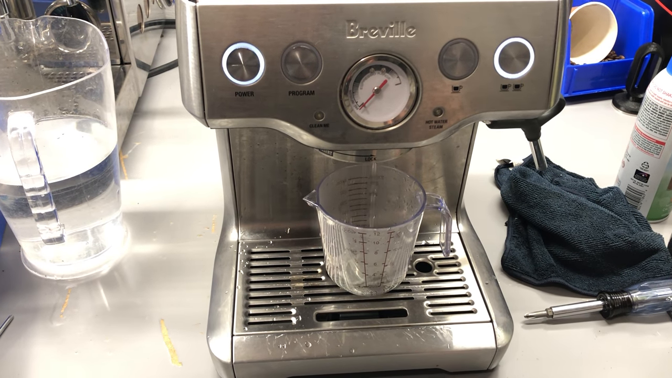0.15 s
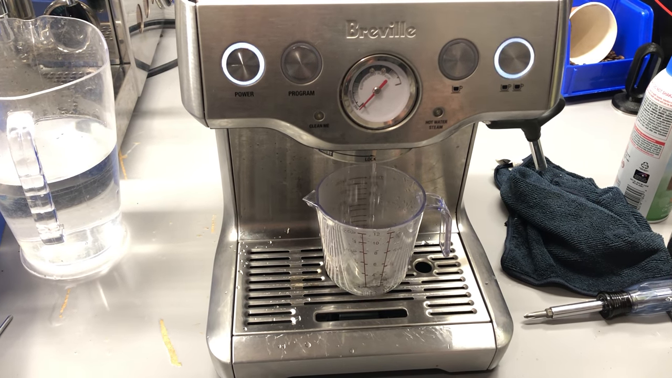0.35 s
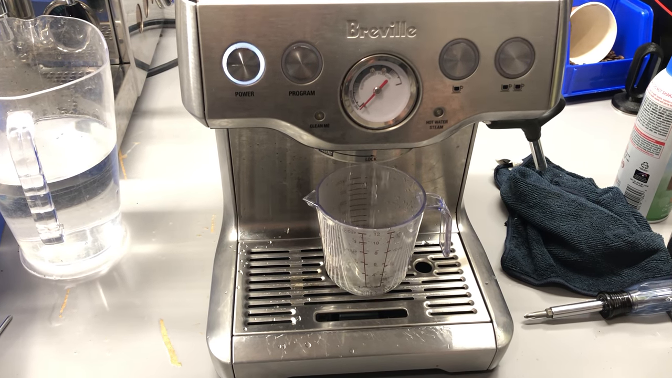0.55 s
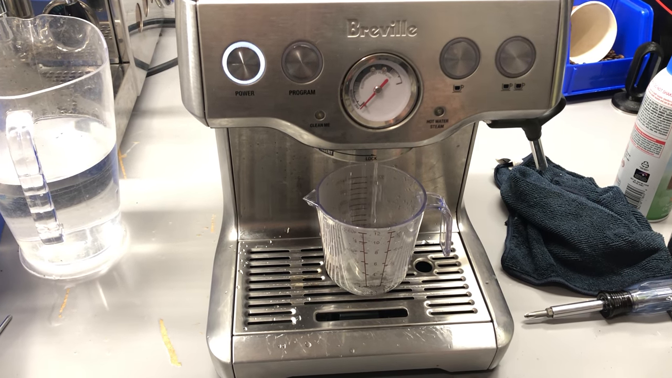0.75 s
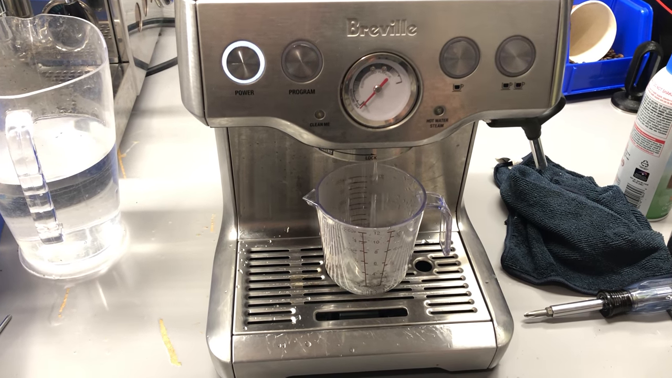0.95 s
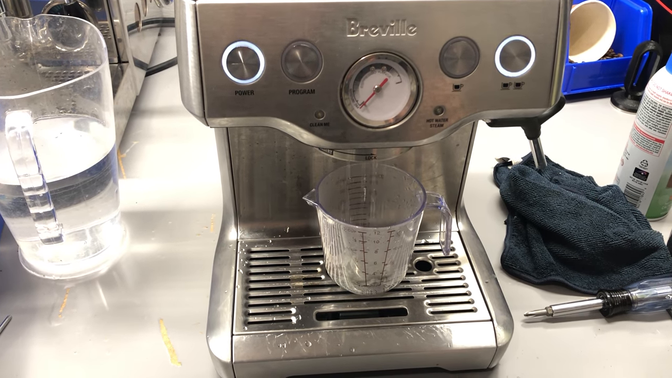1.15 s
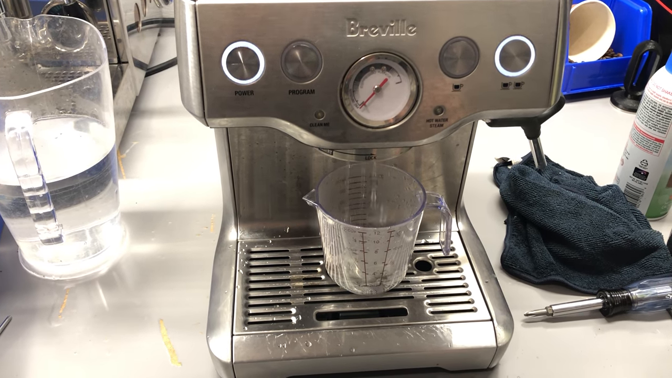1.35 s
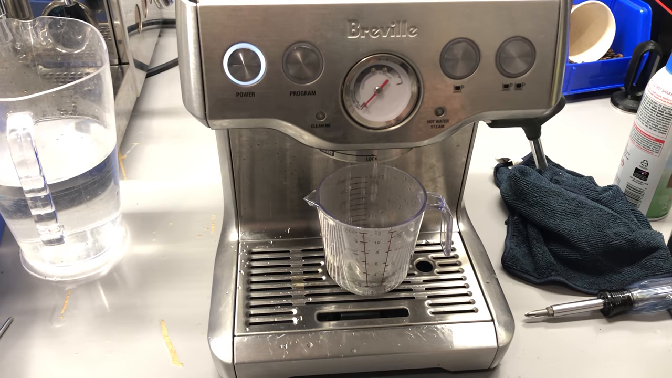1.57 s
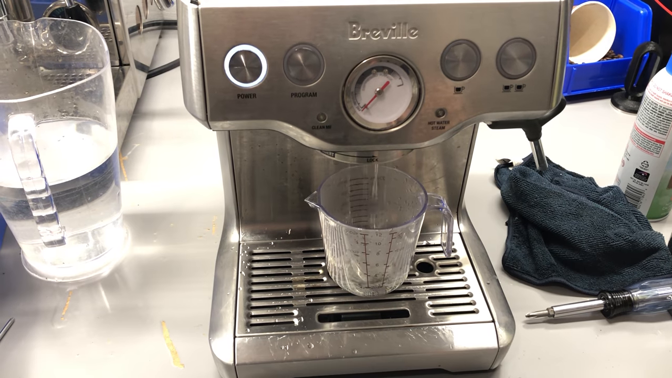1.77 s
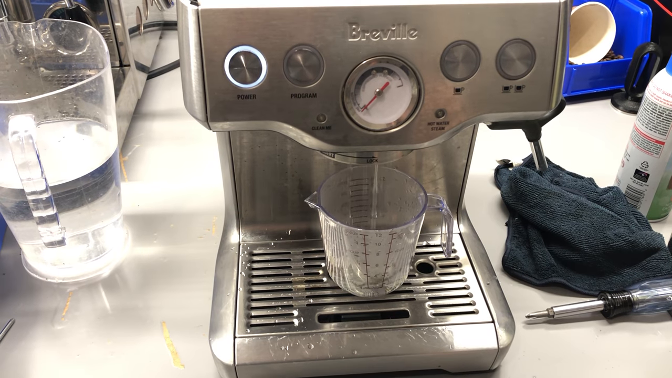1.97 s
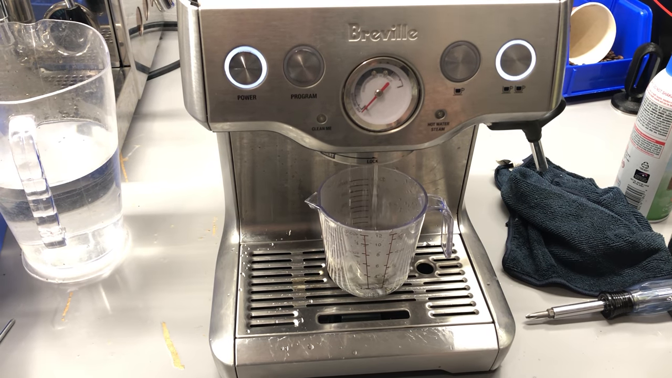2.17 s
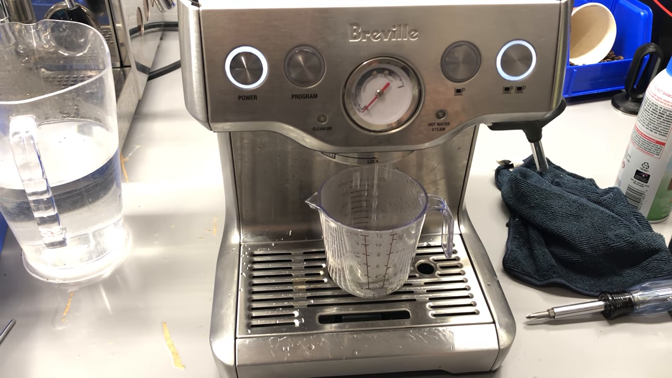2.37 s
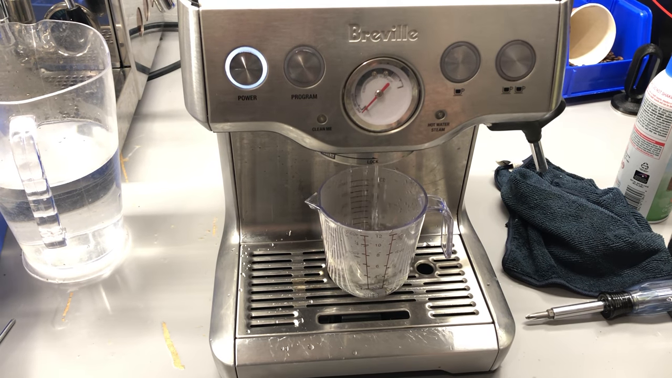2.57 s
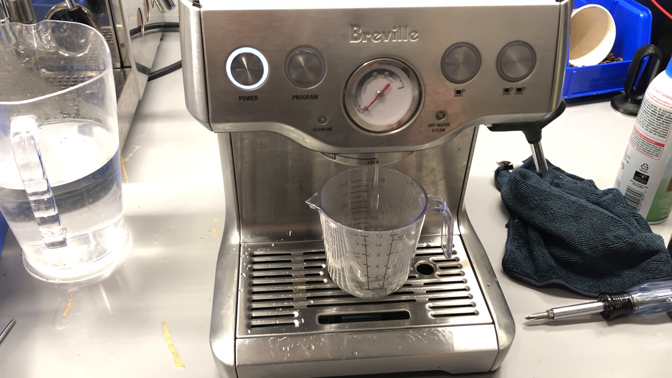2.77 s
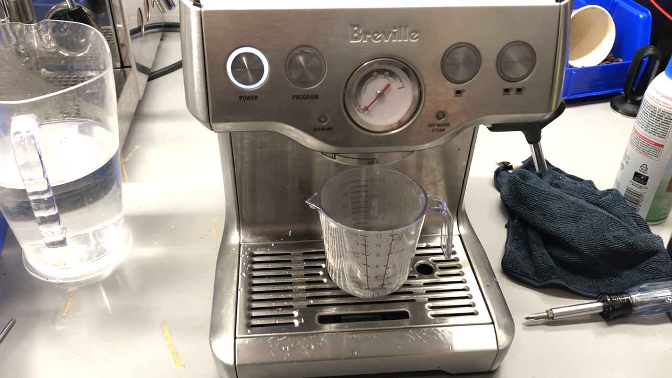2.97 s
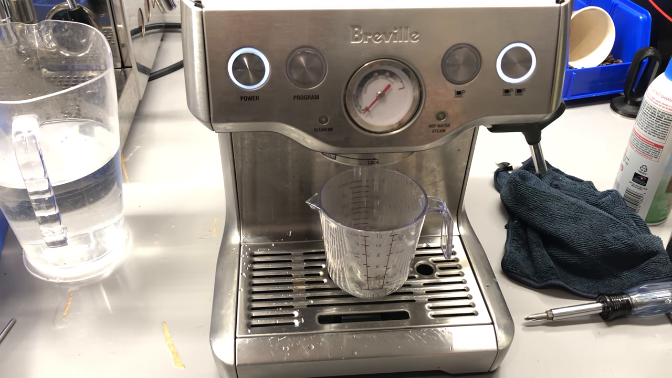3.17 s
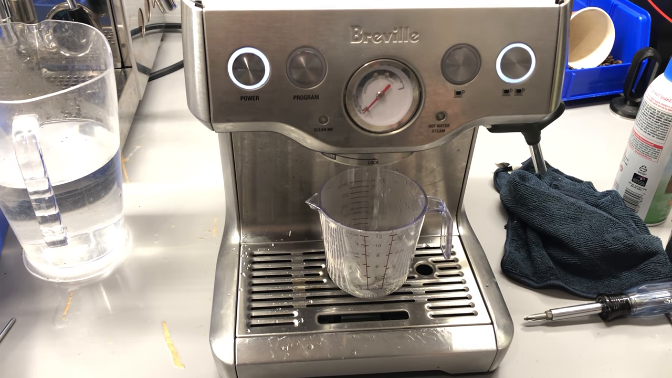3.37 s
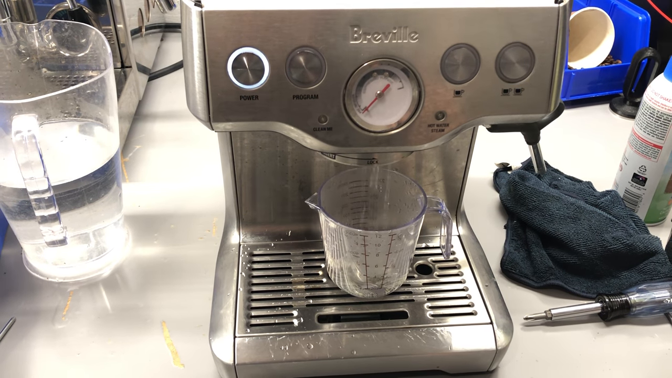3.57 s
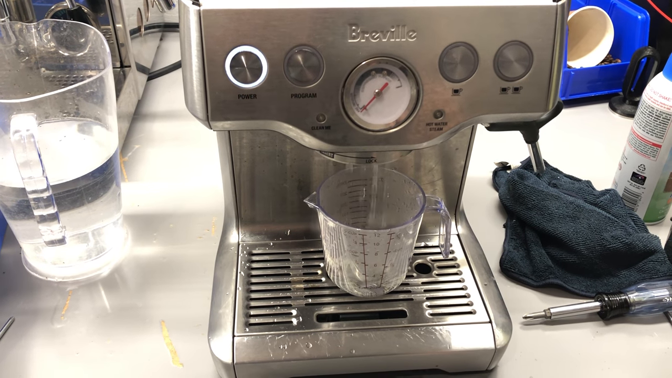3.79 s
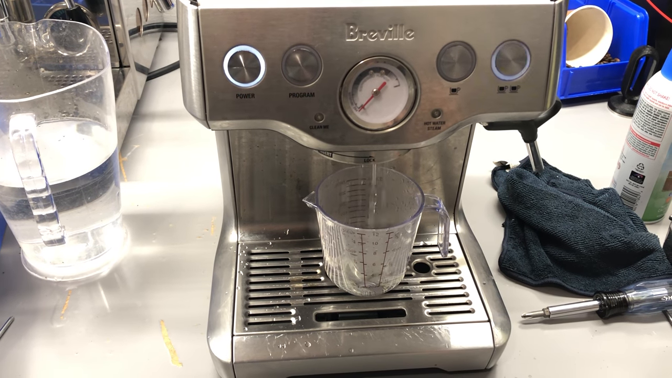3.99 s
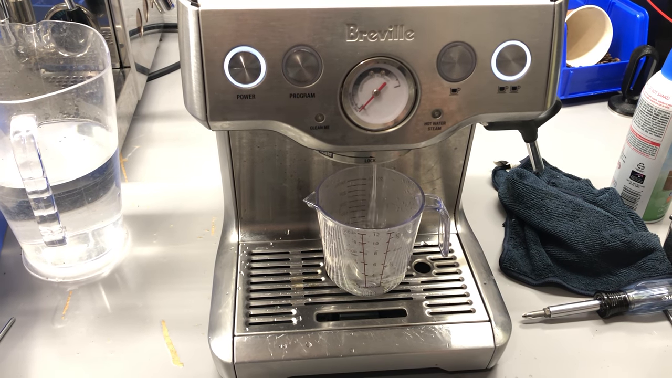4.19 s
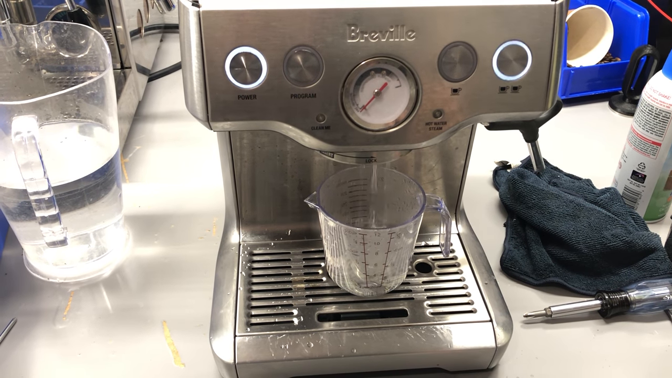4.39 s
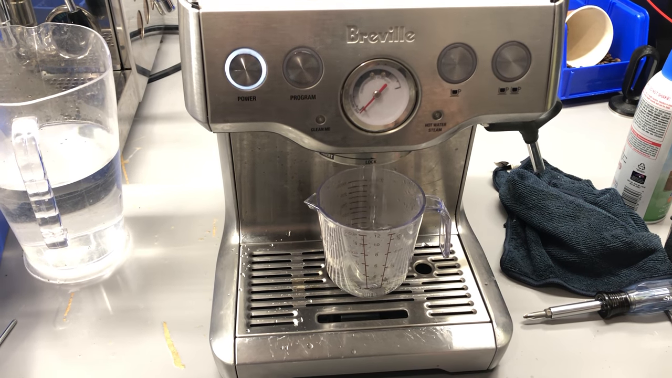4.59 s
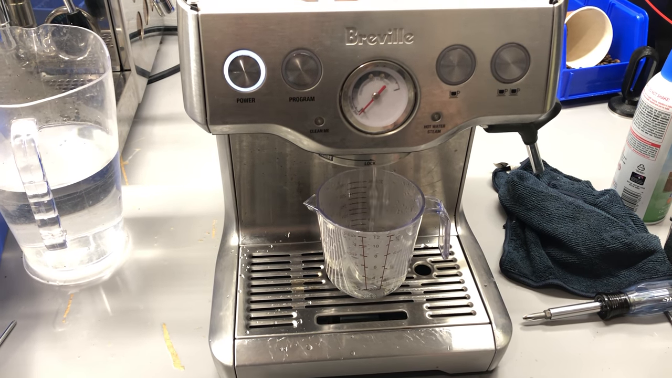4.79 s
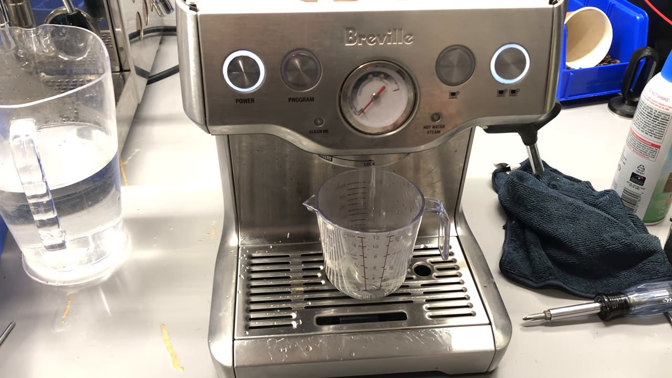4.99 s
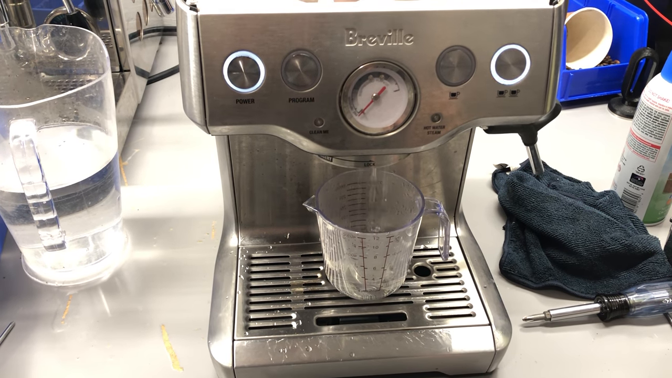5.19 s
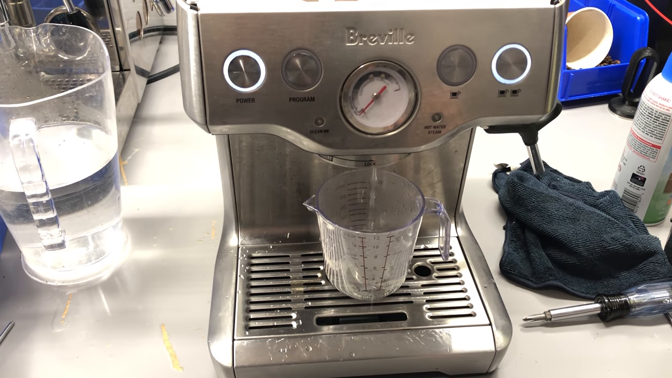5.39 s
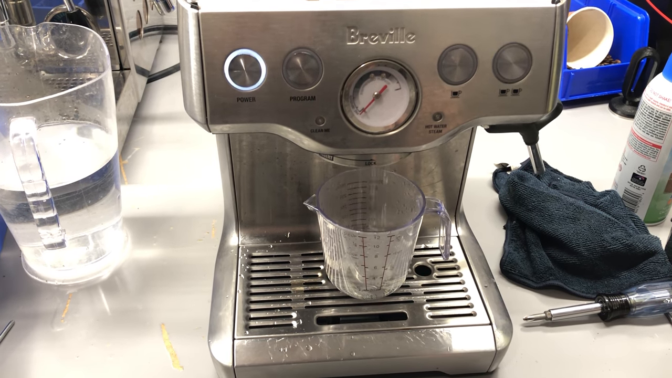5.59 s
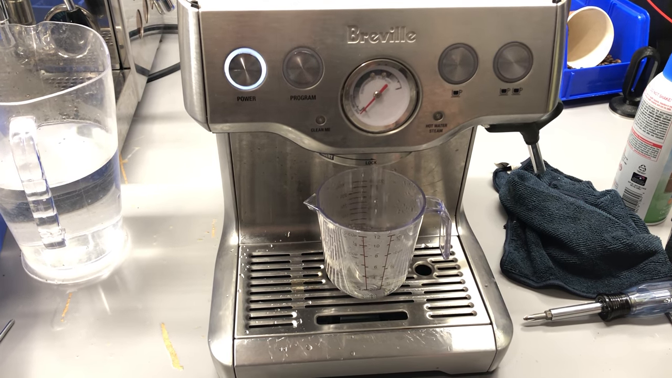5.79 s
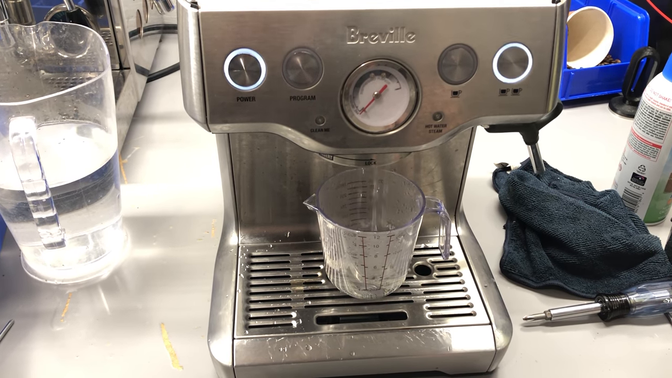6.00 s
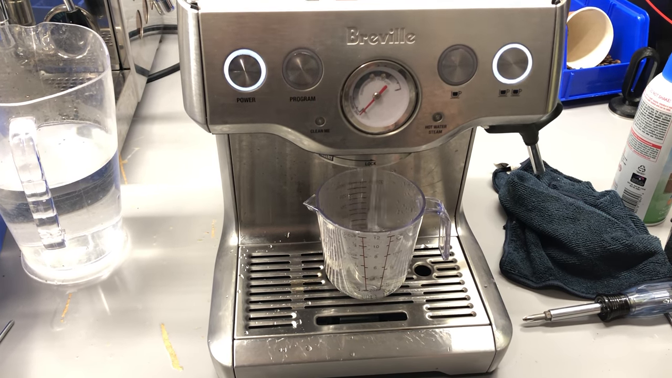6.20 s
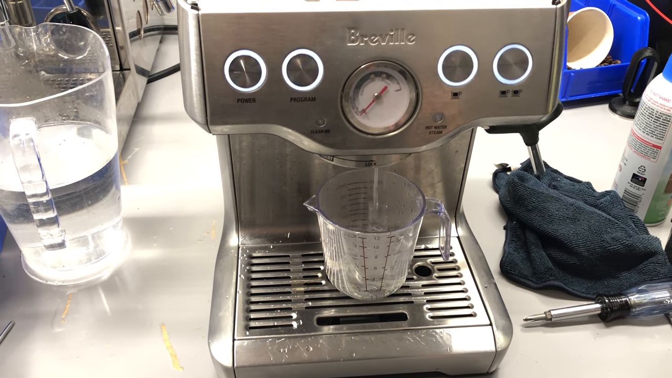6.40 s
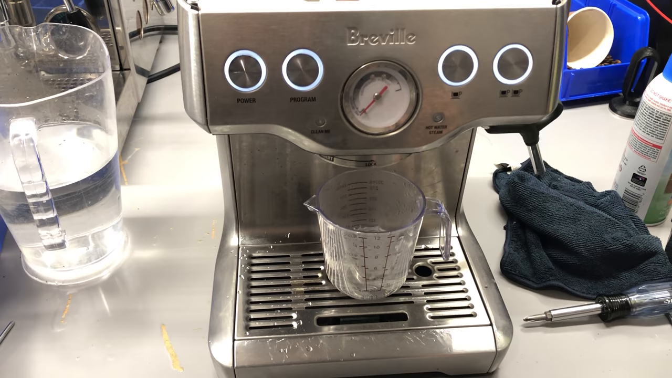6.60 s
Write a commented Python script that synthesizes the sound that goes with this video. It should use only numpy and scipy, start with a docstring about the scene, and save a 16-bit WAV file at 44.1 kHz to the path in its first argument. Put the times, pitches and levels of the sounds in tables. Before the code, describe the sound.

From the start, an espresso machine pump is running close by in a small kitchen with a slight echo. It makes a steady low electric hum with a hard, fast buzz from the metal casing and panels. The drip tray and a plastic jug rattle along with it, the brighter tray rattle rising and falling in short, uneven swells. Beneath the buzz, water hisses and streams softly into the jug with fine bubbling. A few faint drips plink at about 0.7, 3, 4.2 and 5.3 seconds, among occasional tiny ticks. At about 6.4 seconds the pump cuts out suddenly and the water dies away. A short thump of released pressure follows at once, then a sharp, bright valve clack at 6.5 seconds. A couple of small drips and ticks come at about 6.6 seconds, leaving only quiet room tone.

```python
"""An espresso machine's vibrating pump runs water into a plastic jug in a kitchen.
One stroke per mains cycle: the frame hums, the piston knocks on casing and panels,
tray and jug rattle, water spurts and bubbles. The pump cuts out, the line pressure
lets go with a thump, and the valve clacks shut."""
import sys
import numpy as np
from scipy import signal
from scipy.fft import rfft, irfft, next_fast_len
from scipy.io import wavfile

SR = 44100
rng = np.random.default_rng(int(sys.argv[2]) if len(sys.argv) > 2 else 0)


def wav_record(signal):
    """Record a signal, one row per channel, as 16-bit PCM in the file named by sys.argv[1]."""
    frames = np.transpose(np.atleast_2d(signal))
    bounded = np.clip(frames, -1, 1)
    # unit amplitude maps onto the largest positive 16-bit level
    quanta = np.round(bounded * 32767).astype(np.int16)
    wavfile.write(sys.argv[1], SR, quanta)


N = 293265
TIME_S = np.arange(N) / SR
MAINS_HZ = 60.0
PUMP_OFF_S, THUMP_S, CLACK_S = 6.356, 6.4298, 6.508
PUMP_ON = TIME_S < PUMP_OFF_S

# Frame hum. Each row: multiple of the stroke rate, relative level in dB.
HUM_PARTIALS = [(1, 4), (2, -5.5), (3, -20), (4, -6.5), (5, 2.5), (6, -4), (7, -16.5), (8, -13), (9, -15),
                (10, -3), (11, -8), (12, -5.5), (13, -7.5), (14, -9), (15, -12), (16, -6.5)]
# Resonances. Each row: frequency in Hz, width in Hz, relative gain in dB.
CASING_MODES = [(1240, 120, -10), (1694, 336, 8.5), (2156, 140, 0)]
PANEL_MODES = [(1099, 86, 3.5), (1203.7, 107, 0)]
TRAY_MODES = [(3660, 139, -1), (4072, 310, -2), (4400, 210, -10), (4720, 230, -14), (5036, 130, -13)]
JUG_MODES = [(2250, 460, -5.5), (2625, 170, 1), (2823, 216, 2.5), (2970, 210, -1), (3062, 57, 2.5),
             (3334, 107, 0.5)]
# Knock and rattle envelopes. Each row: time in seconds, relative level in dB.
CASING_LEVELS = [(0.02, -40), (1.09, -37.5), (3.46, -38), (5.36, -37), (6.29, -36), (6.33, -35.5)]
PANEL_LEVELS = [(0.02, -30), (1.25, -34.5), (1.78, -33.5), (1.88, -36), (2.13, -31), (2.22, -35.5),
                (2.66, -38.5), (2.8, -34), (2.94, -39), (3.27, -38.5), (3.31, -45), (3.53, -38.5),
                (3.78, -39.5), (4.24, -33.5), (4.59, -36), (5.22, -36.5), (5.77, -41.5), (6.33, -41)]
JUG_LEVELS = [(0.02, -40), (0.14, -41), (2.55, -42), (2.83, -40.5), (3.18, -44), (4.15, -45), (4.26, -41),
              (5.06, -45), (6.33, -45)]
# Swells of the tray rattle. Each row: middle in seconds, length in seconds, rise in dB.
TRAY_SWELLS = [(.8, .1, 3.5), (1.168, 0.14, 4), (1.386, 0.18, 3.5), (1.82, 0.38, 3), (2.135, 0.21, 5),
               (2.608, 0.23, 5), (3.001, 0.072, 4), (3.296, .2, 3), (3.558, 0.14, 6.5), (3.847, .17, 2.5),
               (4.24, .2, 6), (4.523, 0.15, 5.5), (4.701, 0.15, 4), (4.942, 0.081, 4.5), (5.248, 0.33, 3.5),
               (5.83, 0.18, 3.5), (6.145, 0.11, 4.5), (6.345, 0.093, 7)]
# Noise spectra. Each row: frequency in Hz, relative density in dB.
SPRAY_SPECTRUM = [(2820, -11), (4800, -2), (5180, -1), (5440, -5), (6660, -4), (7750, -7.5), (13300, -6.5),
                  (14500, -3), (15100, -3), (16000, -17)]
SIZZLE_SPECTRUM = [(3000, -20), (6000, -38), (10000, 17), (14000, 15), (16000, 11)]
STREAM_SPECTRUM = [(40, -20), (70, -12), (170, -25), (300, -9), (490, -35), (620, -2), (800, 6.5),
                   (920, -3), (1150, -9), (1400, 10.5), (2000, 6.5), (3000, -28.5), (6000, -74)]
CLACK_SPECTRUM = [(150, -17), (400, -1), (1150, -1), (1800, -5.5), (2300, -7.5), (2800, -16), (3900, -10),
                  (5300, -9.5), (6200, -22), (8500, -12.5), (11300, -6.5), (12600, -9), (13800, -9),
                  (16000, -11)]
ROOM_SPECTRUM = [(30, -20), (70, 5.5), (150, -6.5), (400, 0.5), (1000, -15), (4000, -13), (16000, -46)]
# Shut-off ringing. Each row: frequency in Hz, peak in dB, T60 in seconds.
THUMP_MODES = [(405, -30, 0.15), (533, -37, 0.039), (684, -27.5, 0.033), (834, -25.5, 0.033),
               (1010, -22, 0.013)]
VALVE_MODES = [(403, -40, 0.3), (790, -45, .04), (1045, -25, 0.024), (1150, -16.5, 0.022),
               (1270, -23.5, 0.059), (1290, -20.5, 0.022), (1630, -31, .04), (2140, -40, 0.051),
               (3800, -35, 0.035)]
# Drops in the jug. Each row: start in seconds, pitch in Hz, peak in dB, T60 in seconds.
DROPS = [(0.718, 1040, -36, 0.13), (3.08, 2190, -28, 0.037), (4.134, 1350, -27, 0.035),
         (4.22, 1045, -28, .06), (5.291, 1100, -27, 0.034), (6.568, 5750, -43, .025),
         (6.603, 4000, -32.5, 0.013)]
# Sharp ticks. Each row: start in seconds, centre in Hz, onset level in dB, T60 in seconds.
TICKS = [(2.23, 9000, -32, .008), (4.957, 8100, -34, .008), (6.164, 12500, -31, .01),
         (6.4205, 7000, -42.5, .015), (6.426, 9000, -45, .02), (6.5985, 10500, -42, .012),
         (6.622, 12500, -46, .012)]


def pump_hum(level_db=-34.5, dip_db=-1.1, dip_phase_rad=0.56, flutter=0.011, fade_db=0.1939):
    """The coil's pull shakes the frame; higher partials lag, flutter and fade more."""
    phase = 2 * np.pi * MAINS_HZ * (TIME_S - 0.0043)
    dip = plateau(start_s=2.235, end_s=3.885, ramp_s=0.033)  # slightly quieter, phase shifted
    hum = np.zeros(N)
    for k, db in HUM_PARTIALS:
        lag_rad = 0.08 * k ** 2 + 0.01 * k ** 3
        depth = flutter * (k - 1)
        gain = from_db(db + fade_db * (k + 1) * drift(1.503)) * (1 + depth * drift(30))
        hum -= gain * np.cos(k * phase + dip_phase_rad * dip - lag_rad + depth * drift(30))
    running = PUMP_ON + decay(PUMP_OFF_S, t60_s=0.22)
    return from_db(level_db + dip_db * dip) * unit_rms(hum) * running


def piston_knocks(reflection_s=0.0069, reflection_db=-11):
    """The piston hits the casing, and each blow comes back once off the counter-top; its recoil rings the steel
    panels."""
    piston = contact(at_ms=10.0, wander_ms=0.0056, uneven_db=0.3, chatter_db=-2, chatter_ms=14)
    reflection = np.array([np.interp(TIME_S - reflection_s, TIME_S, force) for force in piston])
    recoil = contact(at_ms=11.1, wander_ms=0.018, uneven_db=0.35, chatter_db=-4, chatter_ms=14)
    casing = resonate(piston + from_db(reflection_db) * reflection, CASING_MODES, order=2)
    panels = resonate(recoil, PANEL_MODES, order=2)
    return follow(casing, CASING_LEVELS, trim_db=-5) + follow(panels, PANEL_LEVELS, trim_db=-4)


def tray_rattle(rest_db=-44, start_offset_db=-1.5, loosen_s=0.53):
    """The drip tray works loose, then bounces late in each stroke, in swells."""
    force = contact(at_ms=11.92, wander_ms=0.044, uneven_db=1.2, chatter_db=-1, chatter_ms=2.33)
    tray = 0
    for k, mode in enumerate(TRAY_MODES):
        coupling = 1 + 0.14 * drift(9)  # the contact point creeps
        tray += (-1) ** k * coupling * resonate(force, [mode], order=2)
    level_db = rest_db + start_offset_db * np.maximum(1 - TIME_S / loosen_s, 0)
    for middle_s, length_s, rise_db in TRAY_SWELLS:
        level_db += rise_db * plateau(middle_s - length_s / 2, middle_s + length_s / 2, ramp_s=0.12)
    return from_db(level_db) * unit_rms(tray)


def jug_rattle():
    """The loose jug bounces unevenly, mostly in tiny rebounds."""
    force = contact(at_ms=12.5, wander_ms=0.0077, uneven_db=2, chatter_db=7, chatter_ms=10.6)
    return follow(resonate(force, JUG_MODES), JUG_LEVELS, trim_db=-4.5)


def spray(level_db=-43.5, slope_db_per_s=-0.14, grain_db=2):
    """Hiss pulses with the pump: short intake, long push, sharp peak at the end stop."""
    intake = from_db(-6) * stroke_window(at_ms=8.0, sigma_ms=0.73)
    push = from_db(-5) * stroke_window(at_ms=12.2, sigma_ms=3.9)
    hiss = noise(SPRAY_SPECTRUM) * (intake + push + from_db(-15) * PUMP_ON)
    sizzle = from_db(-2) * noise(SIZZLE_SPECTRUM) * stroke_window(at_ms=11.45, sigma_ms=0.69)
    grain = from_db(grain_db * drift(500))
    return from_db(level_db + slope_db_per_s * TIME_S) * unit_rms((hiss + sizzle) * grain)


def stream(rush_db=-47, bubbles_db=-52, bubbles_per_s=260):
    """Water runs into the jug: a soft rush with many small bubbles."""
    flow = PUMP_ON + decay(PUMP_OFF_S, t60_s=0.34)
    births = (rng.random(N) < bubbles_per_s / SR) * rng.uniform(0.9, 1, N)
    pitches_hz = np.geomspace(800, 4500, 16)
    pitch_index = rng.integers(0, len(pitches_hz), N)
    bubbles = 0
    for k, hz in enumerate(pitches_hz):
        bubbles += unit_rms(resonate(births * (pitch_index == k), [(hz, hz / 9, 0)]))
    return flow * (from_db(rush_db) * noise(STREAM_SPECTRUM) + from_db(bubbles_db) * unit_rms(bubbles))


def pressure_thump():
    """The line pressure lets go."""
    return ring(THUMP_S, THUMP_MODES)


def valve_clack(touch_db=-26, seat_db=-19, t60_s=0.024):
    """The plunger touches, then seats with a bright clack."""
    seat_s = CLACK_S + 0.0014
    envelope = from_db(touch_db) * decay(CLACK_S, t60_s) + from_db(seat_db) * decay(seat_s, t60_s)
    return ring(seat_s, VALVE_MODES) + envelope * noise(CLACK_SPECTRUM)


def drops():
    """Each drop rings at one pitch."""
    return sum(ring(start_s, [mode]) for start_s, *mode in DROPS)


def ticks():
    """Short noise bursts, an octave wide."""
    out = 0
    for start_s, hz, db, t60_s in TICKS:
        band = signal.butter(2, [hz / np.sqrt(2), hz * np.sqrt(2)], "band", fs=SR, output="sos")
        hiss = unit_rms(signal.sosfilt(band, rng.standard_normal(N)))
        out += from_db(db) * decay(start_s, t60_s) * hiss
    return out


def kitchen_echo(x, split_hz=3500, low_t60_s=0.39, treble_t60_s=0.29, delay_s=0.006):
    """Diffuse echo of a small hard room; the treble dies sooner."""
    white = rng.standard_normal(N)
    low = signal.sosfilt(signal.butter(1, split_hz, fs=SR, output="sos"), white)
    low_decay = decay(delay_s, low_t60_s)
    tail = low * low_decay + from_db(-2) * (white - low) * decay(delay_s, treble_t60_s)
    return signal.fftconvolve(x, tail[:SR] / np.linalg.norm(low_decay))[:N]


def contact(at_ms, wander_ms, uneven_db, chatter_db, chatter_ms):
    """Two rows of force: one jittered blow per stroke, and a chatter of tiny rebounds."""
    blows = stroke_window(at_ms + wander_ms * (drift(MAINS_HZ) + drift(6)), sigma_ms=0.04)
    chatter = stroke_window(at_ms, chatter_ms) * rng.standard_normal(N)
    blows *= from_db(uneven_db * drift(MAINS_HZ))
    return np.array([unit_rms(blows), from_db(chatter_db) * unit_rms(chatter)])


def stroke_window(at_ms, sigma_ms):
    """A Gaussian window in every pump stroke."""
    period_ms = 1000 / MAINS_HZ
    offset_ms = (TIME_S * 1000 - at_ms + period_ms / 2) % period_ms - period_ms / 2
    return np.exp(-0.5 * (offset_ms / sigma_ms) ** 2) * PUMP_ON


def resonate(force, modes, order=1):
    """Parallel resonances of alternating sign; at order 2 they swell before fading."""
    out = 0
    for k, (hz, width_hz, db) in enumerate(modes):
        radius = np.exp(-np.pi * width_hz / SR)
        gain = (1 - radius ** 2) / 2
        section = [gain, 0, -gain, 1, -2 * radius * np.cos(2 * np.pi * hz / SR), radius ** 2]
        out += (-1) ** k * from_db(db) * signal.sosfilt([section] * order, force + 1e-18)
    return out


def ring(start_s, modes):
    """Damped sines set off by one blow."""
    out = 0
    for k, (hz, db, t60_s) in enumerate(modes):
        tone = np.sin(2 * np.pi * hz * (TIME_S - start_s))
        out += (-1) ** k * from_db(db) * decay(start_s, t60_s) * tone
    return out


def noise(spectrum):
    """Shaped noise, rms 1."""
    hz, db = np.transpose(spectrum)
    size = next_fast_len(N)
    bins_hz = np.maximum(np.fft.rfftfreq(size, 1 / SR), 1)
    gain = from_db(np.interp(np.log(bins_hz), np.log(hz), db))
    return unit_rms(irfft(rfft(rng.standard_normal(size)) * gain, size)[:N])


def drift(knots_per_s):
    """Random wander, rms 1."""
    knots = rng.standard_normal(4000)
    return unit_rms(np.interp(TIME_S * knots_per_s, np.arange(len(knots)), knots))


def follow(x, levels, trim_db):
    """Normalise, then apply a level curve."""
    return from_db(np.interp(TIME_S, *np.transpose(levels)) + trim_db) * unit_rms(x)


def decay(start_s, t60_s):
    """Jumps to 1, then dies away."""
    age_s = TIME_S - start_s
    return (age_s >= 0) * from_db(-60 * np.clip(age_s / t60_s, 0, 4))


def plateau(start_s, end_s, ramp_s):
    """Trapezoid with ramps centred on start and end."""
    return np.clip(0.5 + np.minimum(TIME_S - start_s, end_s - TIME_S) / ramp_s, 0, 1)


def from_db(db):
    """Decibels to gain."""
    return 10 ** (np.asarray(db) / 20)


def unit_rms(x):
    """Scale to rms 1."""
    return x / np.sqrt(np.mean(x ** 2) + 1e-20)


def scene():
    """The machine close by; hum and stroke blows stay dry, its other sounds echo."""
    blows, chatter = piston_knocks() + tray_rattle() + jug_rattle()
    wash = chatter + spray() + stream()
    clicks = valve_clack() + drops() + ticks()
    thump = pressure_thump()
    send = from_db(-2.5) * wash + from_db(-6) * clicks + from_db(-10) * thump
    # Sound leaves from changing places on the machine, each with its own echo.
    blend_rad = np.pi * drift(5)
    echo = kitchen_echo(send * np.cos(blend_rad)) + kitchen_echo(send * np.sin(blend_rad))
    machine = pump_hum() + blows + wash + clicks + thump
    room_tone = from_db(-55) * noise(ROOM_SPECTRUM)
    return (machine + echo + room_tone)[None]


def record(dry):
    """Steep low-pass at 15.9 kHz."""
    return signal.sosfilt(signal.ellip(10, 0.2, 80, 15900, fs=SR, output="sos"), dry)


dry = scene()
out = record(dry)
wav_record(out)
```